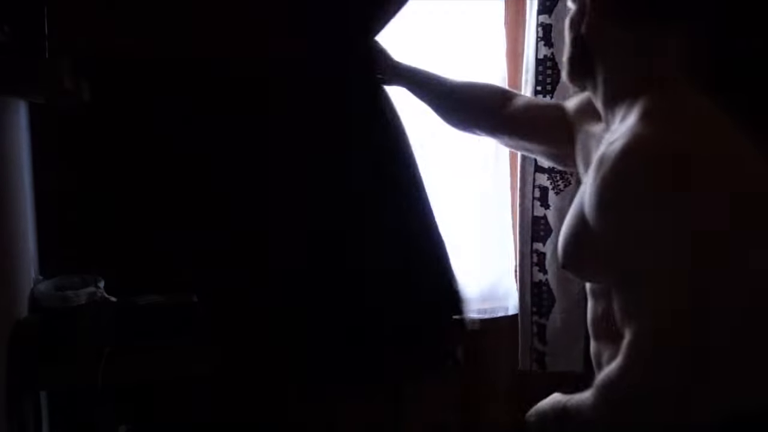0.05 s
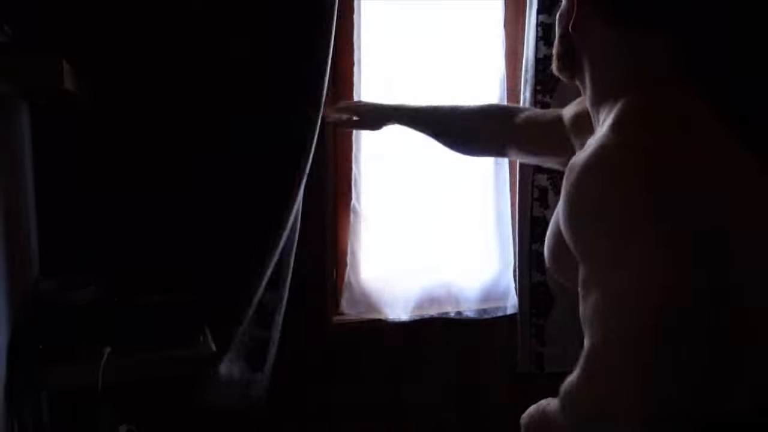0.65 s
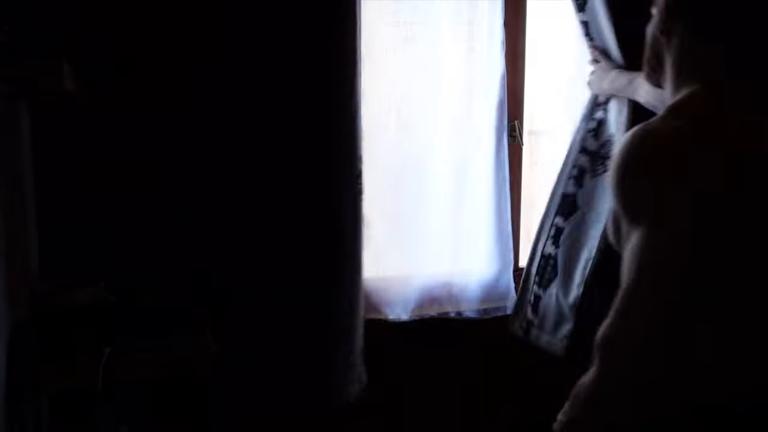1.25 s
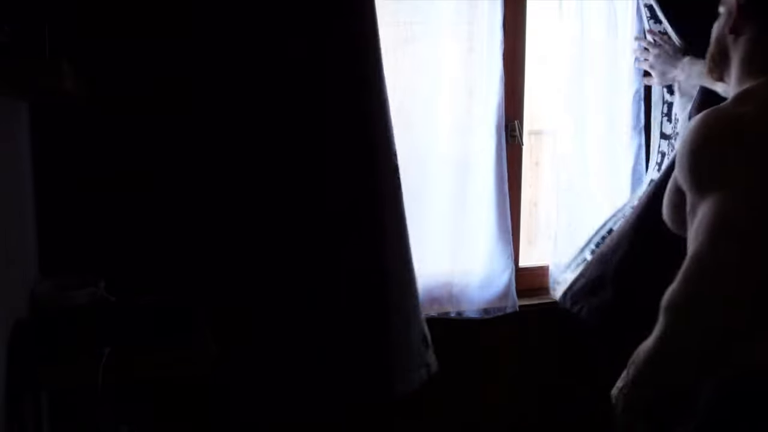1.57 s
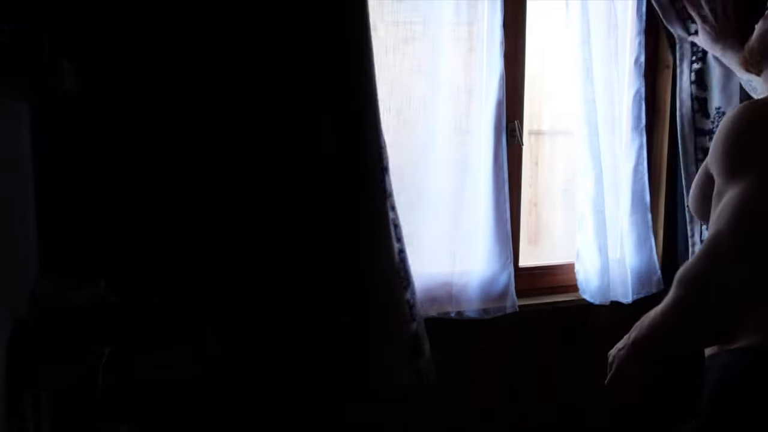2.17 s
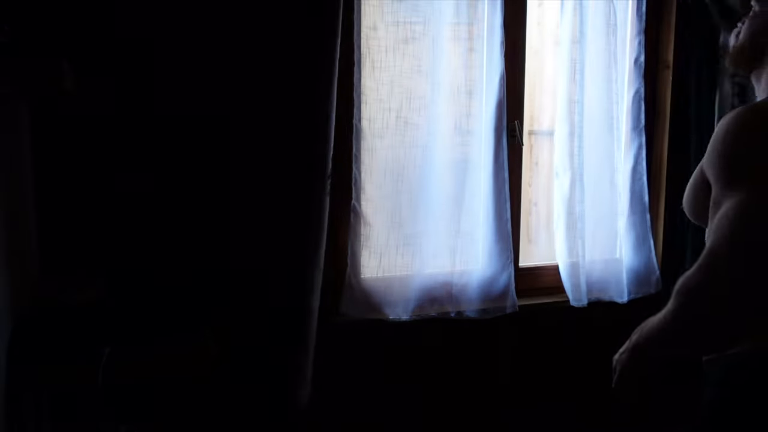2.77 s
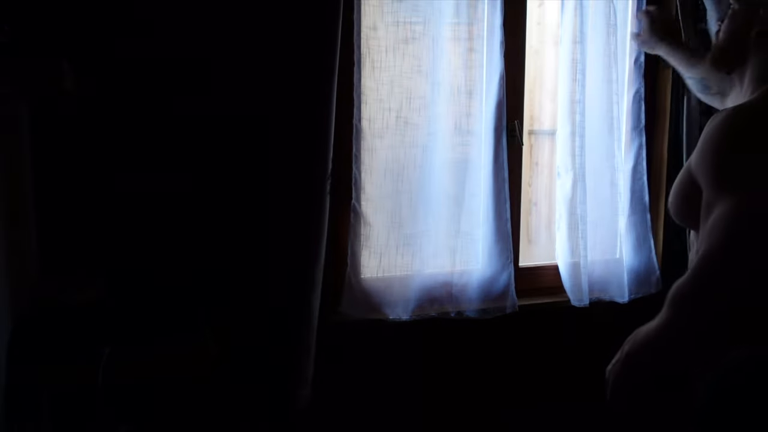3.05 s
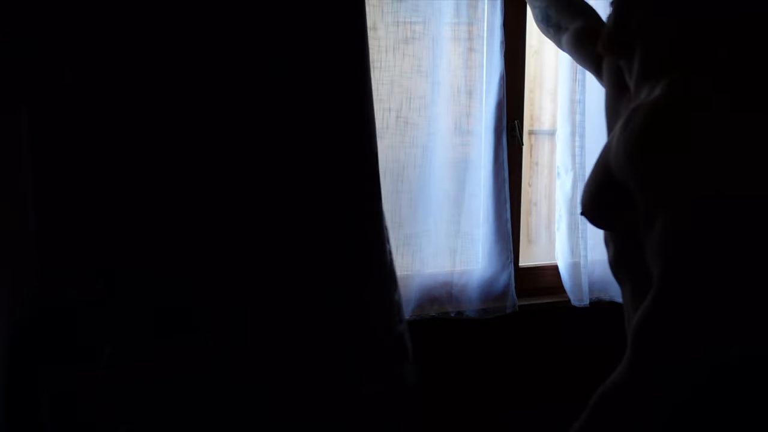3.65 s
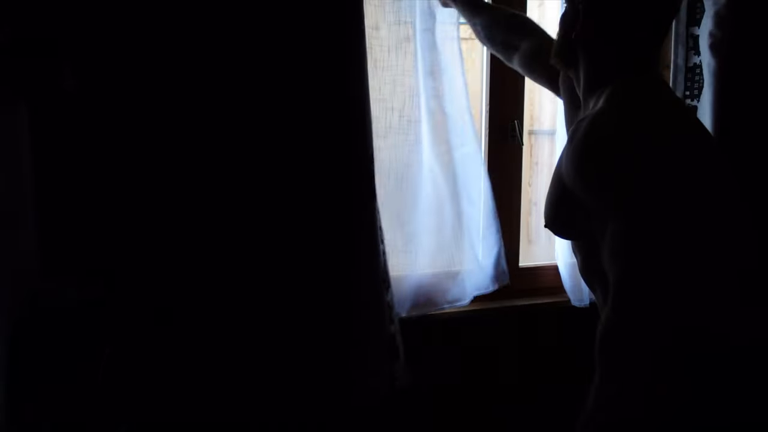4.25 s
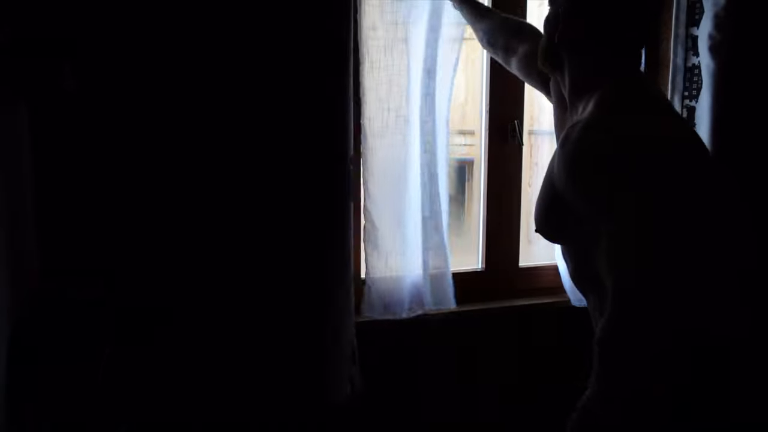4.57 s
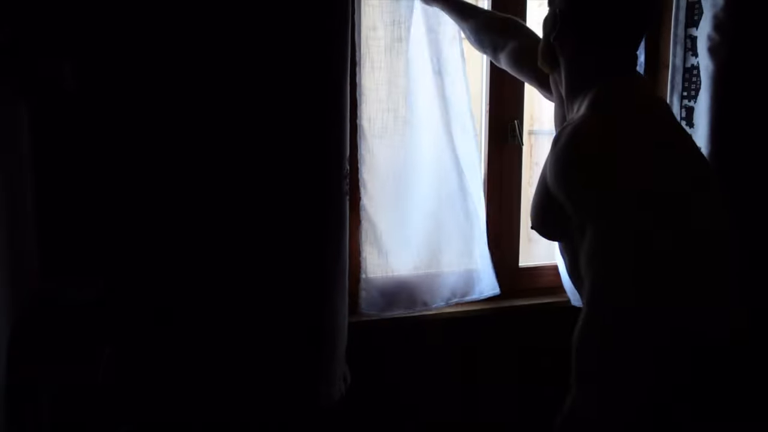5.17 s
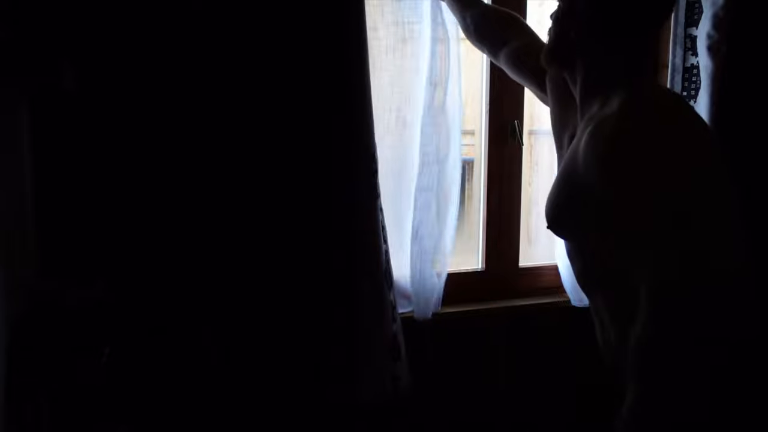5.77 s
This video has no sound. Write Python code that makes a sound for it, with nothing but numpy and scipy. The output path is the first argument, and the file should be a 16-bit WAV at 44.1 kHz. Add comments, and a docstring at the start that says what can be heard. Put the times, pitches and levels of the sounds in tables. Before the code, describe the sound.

Rings scrape quickly along a pole and clack together as a hand pulls a heavy curtain aside. After a short lull, another curtain slides in several quieter tugs, its folds swishing until the rings bunch up. Last come very soft brushes of a net curtain, with a small click and slight groans from its rod. Everything is heard from almost straight ahead in a small, quiet room with brief echoes.

```python
"""A bright scrape and a clatter of rings: a heavy curtain is pulled open by hand in a small bedroom.
The left one goes first, then the right, then the light net curtain behind them.
Rings stick and slip along the pole and clack together as the cloth bunches; the folds swish and flap.
The net hisses along its thin rod, which knocks and groans softly under the hem.
Short wall echoes and a faint room tone sit behind it all."""
import sys
import numpy as np
from scipy import signal
from scipy.io import wavfile

SR = 44100
rng = np.random.default_rng(int(sys.argv[2]) if len(sys.argv) > 2 else 0)


def unload_audio(sound):
    """Save the sound as a 16-bit wav file, at the path given as the first command line argument."""
    columns = np.transpose(np.atleast_2d(sound))
    # keep every value between -1 and 1, then stretch to whole-number steps
    steps = np.round(np.clip(columns, -1, 1) * 32767)
    wavfile.write(sys.argv[1], SR, steps.astype(np.int16))


N = 260184
TIME = np.arange(N) / SR
EDGES = np.geomspace(35, 17000, 23)   # filter bank, Hz
CENTRES = np.sqrt(EDGES[1:] * EDGES[:-1])
BANK = [signal.butter(2, pair, "band", fs=SR, output="sos") for pair in zip(EDGES, EDGES[1:])]

# Tone colours. Each row: frequency in Hz, relative level in dB.
AIR_MID_EQ = [(18, -67), (30, -36.5), (149, 2), (394, -1), (649, -6), (702, -1), (937, -5.5), (1040, -3.5),
              (1720, -7.5), (1860, -9), (2230, -5.5), (2750, -10.5), (3980, -13), (4910, -14), (16000, -22)]
AIR_SIDE_EQ = [(18, -65), (30, -35), (197, 2.5), (241, 1.5), (665, -8), (1050, 0), (5910, -21),
               (10600, -37), (13000, -43.5)]
NET_HISS_EQ = [(1300, 5.5), (2000, 4), (3200, 2), (5000, -1), (7500, -1), (10000, -4), (15500, -11)]
NET_FOLDS_EQ = [(30, -18), (60, -16), (110, 0.5), (180, 2), (400, -5)]
HEM_EQ = [(250, 11), (450, 12), (900, 9), (1500, -20), (2500, -18)]
CLOTH_HISS_EQ = [(2500, -12.5), (5000, 4), (7000, 2), (10000, -4.5), (13000, -10.5), (15500, -17)]
LEFT_FOLDS_EQ = [(50, -31), (80, -14), (125, -5), (200, -4.5), (260, -3), (360, -3), (470, -5.5), (620, -7)]
RIGHT_FOLDS_EQ = [(50, -22), (75, -20), (115, -0.5), (180, -2.5), (260, -1), (360, -1.5), (470, -5),
                  (620, -15)]
LEFT_SCRAPE_EQ = [(700, -14.5), (900, -7), (1100, 0), (1600, 1), (2200, -8), (2800, -2), (3600, -9.5),
                  (4700, -11.5), (6000, -31.5), (11000, -33)]
RIGHT_SCRAPE_EQ = [(800, -13), (1100, -0.5), (1500, -1), (2200, -0.5), (3400, 3), (4700, -5.5),
                   (5800, -7.5), (11000, -35)]
HOLLOW_POLE_EQ = [(400, -11.5), (520, -2.5), (640, 2), (800, 4), (1000, -9.5)]
JOSTLE_EQ = [(210, -37.5), (350, -4.5), (1430, -3.5), (2000, 0), (2130, 0.5), (2980, -2.5), (3920, 0),
             (5060, -10), (10600, -21.5), (16000, -33.5)]
CLACK_EQ = [(40, -25), (110, -14), (250, 7.5), (400, -8.5), (750, 0), (4500, 1.5), (6500, 2), (10000, -1.5),
            (15500, -8)]

# Resonances. Each row: frequency in Hz, width in Hz, relative gain in dB.
AIR_MODES = [(1120, 250, -7.5), (1690, 130, 9)]   # faint colour of the room tone
WEAVE_MODES = [(3230, 1400, -8), (5070, 860, 1), (7700, 320, 3)]   # threads zipping over the rod
ROD_MODES = [(840, 47, 2), (1385, 180, 7.5), (1596, 50, 11.5), (2780, 150, -1.5), (3210, 74, 4),
             (4110, 81, 2.5), (5720, 110, 5)]
FREE_RING_MODES = [(1250, 63, 2.5), (1700, 220, -1.5), (3250, 90, -5.5), (3730, 100, -2.5),
                   (4390, 130, -0.5), (4800, 120, -3)]
LEFT_POLE_MODES = [(350, 67, 3), (1076, 100, -1.5), (1163, 35, -0.5), (1526, 290, 1), (2044, 290, -0.5),
                   (2700, 230, -2), (4000, 220, 0.5), (5480, 140, -4)]   # each half of the pole with its rings
RIGHT_POLE_MODES = [(605, 87, -0.5), (741, 330, 1.5), (1183, 47, 1), (1566, 120, 1.5), (1840, 87, -6.5),
                    (2380, 170, -16), (3200, 340, -10), (3910, 79, -8), (4380, 46, -2), (4780, 370, -3.5)]

# The bedroom's decay. Each row: frequency in Hz, seconds to fade by 60 dB.
ROOM_T60 = [(100, 0.66), (300, .32), (1200, 0.27), (4000, 0.24), (14000, 0.2)]

# The cues below give relative levels. A swell's rise and fall are the times it takes over its top 10 dB.
# The thin rod groaning. Each row: start in seconds, length in seconds, pitch in Hz, level in dB.
GROANS = [(4.598, .035, 271.6, -59), (4.692, 0.07, 281.5, -64.5), (5.03, .145, 290.6, -57),
          (5.265, 0.019, 272.3, -57.5), (5.364, .12, 281, -66.5), (5.513, .035, 281, -52.5),
          (5.587, 0.038, 277, -51)]
# Strokes of the net. Each row: peak time, rise and fall in seconds, then hiss, folds and sheen in dB.
NET_STROKES = [(4.04, 0.12, 0.22, -56.5, -66.5, -67), (4.205, 0.052, 0.075, -62.5, -77, -59),
               (4.52, .17, 0.21, -72.5, -68.5, -74.5), (4.745, 0.059, 0.088, -57, -62, -65),
               (4.99, 0.049, 0.16, -47.5, -68.5, -57.5), (5.1, 0.033, 0.11, -52.5, -69, -53),
               (5.36, 0.3, .25, -68, -67, -69), (5.535, 0.034, 0.048, -59, -67, -63.5),
               (5.885, 0.027, 0.024, -66, -74.5, -61)]
# Its hem catching on the rod. Each row: peak time, rise and fall in seconds, level in dB.
HEM_RUBS = [(5.075, 0.048, 0.093, -51.5), (5.535, 0.025, 0.059, -56)]
# Single rings pinging and soft bumps on the window frame.
# Each row: start in seconds, pitch in Hz, level in dB, seconds to fade by 60 dB.
PINGS_AND_BUMPS = [(0.1522, 5090, -15.5, 0.0098), (0.233, 7470, -10, 0.013), (0.241, 6000, -14, 0.017),
                   (3.0215, 3423, -54, 0.051), (4.718, 120.4, -49, 0.29), (5.191, 103.6, -56.5, 0.24)]
# Clacks of rings, pole and rod; harder contacts centre higher.
# Each row: start in seconds, level in dB, centre in Hz, roll-off to either side in dB per octave.
CLACKS = [(0.151, -15.5, 1700, 3.5), (0.234, -7, 5600, 1.5), (0.238, -3.5, 3500, 8.5),
          (0.263, -8.5, 2900, 6.5), (0.286, -8, 3820, 4), (0.292, -7.5, 4000, 2), (0.3, -3, 3880, 8),
          (0.309, -4.5, 4300, 3), (0.317, -17, 2100, 8), (0.342, -1.5, 1680, 8.5), (0.346, -2, 1600, 6.5),
          (0.355, -9.5, 1396, 5), (0.366, -3, 1550, 10), (0.372, -23, 1391, 6.5), (0.381, -16.5, 1208, 2.5),
          (0.698, -41, 2988, 26), (2.137, -41.5, 3890, 5.5), (2.385, -33, 770, 16), (2.469, -33, 850, 16),
          (2.491, -34, 1400, 9), (2.676, -11, 1280, 7), (2.68, -11, 725, 7.5), (2.698, -22.5, 900, 4),
          (2.744, -19.5, 1500, 7), (2.749, -15.5, 3000, 10), (2.802, -23, 840, 7.5), (2.81, -25.5, 597, 8),
          (3.021, -37.5, 3212, 5), (4.746, -25.5, 4100, 11), (4.754, -23.5, 2400, 7)]
# Heavy cloth gathered in the hand or swinging back.
# Each row: peak time, rise and fall in seconds, then hiss and folds in dB.
SWISHES = [(0.135, 0.085, .08, -44.5, -61), (0.55, 0.11, .23, -58.5, -62.5), (1.36, 0.26, 0.5, -58, -59.5),
           (2.22, 0.1, 0.07, -61, -59), (2.46, 0.2, 0.056, -56, -56.5), (2.94, 0.12, 0.22, -60, -60.5),
           (3.06, 0.028, 0.062, -75, -57)]
# Rings and cloth piling up at the end of a pull.
# Each row: peak time, rise and fall in seconds, then jostling rings and folds in dB.
PILE_UPS = [(0.24, .005, 0.088, -21, -44), (0.305, .03, 0.022, -11.5, -36.5),
            (0.349, 0.0095, 0.021, -14, -26), (0.385, .03, .04, -35.5, -31),
            (2.68, 0.0086, 0.0513, -29, -49.5), (2.715, 0.027, 0.072, -33.5, -29.5)]
# Tugs that slide a heavy curtain along its pole.
# Each row: time of top speed, rise and fall in seconds, then scrape and weight on the rings in dB.
TUGS = [(0.003, 0.027, 0.013, -30, -5), (0.18, 0.18, 0.14, -27.5, -3.5), (1.461, 0.07, 0.075, -42, -12.5),
        (1.915, 0.08, 0.13, -45.5, -2.5), (2.235, 0.027, 0.018, -60.5, -2), (2.494, 0.041, 0.031, -49.5, 4),
        (2.666, 0.14, 0.022, -36, -7)]

TUG_CURVE, CLOTH_CURVE, PILE_CURVE = 1.7, 1.3, 1.05   # swell shape: 1 is pointed, 2 is round


def from_db(db):
    """Decibels to gain."""
    return 10 ** (np.asarray(db) / 20)


def rms_one(x):
    """Scale to unit power."""
    return x / np.sqrt(np.mean(x ** 2) + 1e-20)


def at_hz(points, hz):
    """Read a table on a log-frequency axis."""
    f, value = np.transpose(points)
    return np.interp(np.log(hz), np.log(f), value)


def drift(per_s):
    """A random wander of unit power, with per_s turning points a second."""
    knots = np.arange(0, 7, 1 / per_s)
    return rms_one(np.interp(TIME, knots, rng.standard_normal(len(knots))))


def colour(sources, eq, flicker_db=0):
    """Shape noise to an EQ: bands take the two sources in turn, each with a flicker of its own."""
    out = np.zeros(N)
    for k, (sos, hz) in enumerate(zip(BANK, CENTRES)):
        if eq[0][0] / 1.2 < hz < eq[-1][0] * 1.2:
            gain = from_db(at_hz(eq, hz) + flicker_db * drift(25))
            out += gain * signal.sosfilt(sos, sources[k % 2])
    return rms_one(out)


def slips(per_s, spread_db):
    """Two trains of tiny stick-slip releases, sharing their moments but not their strengths."""
    sizes = from_db(spread_db * np.minimum(rng.exponential(1, N), 4))
    released = rng.random(N) < per_s / SR
    return released * sizes * rng.standard_normal((2, N)) / np.sqrt(per_s) + 1e-18


def ringing(x, modes):
    """The modes that x excites, each a two-pole band-pass."""
    out = np.zeros(N)
    for hz, width, db in modes:
        r = np.exp(-np.pi * width / SR)
        feedback = [1, -2 * r * np.cos(2 * np.pi * hz / SR), r * r]
        out += from_db(db) * signal.lfilter(np.array([1, 0, -1]) * (1 - r * r) / 2, feedback, x)
    return out


def body(x, modes, ring_db):
    """A sound plus the modes it sets ringing, at unchanged power."""
    return rms_one(x + from_db(ring_db) * ringing(x, modes)) * np.sqrt(np.mean(x ** 2))


def swells(rows, span, curve, column=0, steepness=1):
    """Envelope of the moves within the span: each swells to the level in one dB column; powers add."""
    power = np.zeros(N)
    for s, rise_s, fall_s, *db in rows:
        if span[0] <= s < span[1]:
            away = np.maximum((s - TIME) / rise_s, (TIME - s) / fall_s)
            swell_db = -10 * np.minimum(away, 20) ** curve
            power += from_db(db[column] + steepness * swell_db) ** 2
    return np.sqrt(power + 1e-30)


def room_tone(level_db, side_db):
    """A faint, wide bed of steady room noise and hiss."""
    mid = body(colour(rng.standard_normal((2, N)), AIR_MID_EQ, flicker_db=0.1), AIR_MODES, ring_db=-8.5)
    side = from_db(side_db) * colour(rng.standard_normal((2, N)), AIR_SIDE_EQ)
    return from_db(level_db) * np.array([mid + side, mid - side])


def echoes(build_s, early_db=0):
    """Strong reflections from the window recess, then wall echoes that die band by band."""
    t = TIME[:SR // 2]
    early_lift = 1 + from_db(early_db) * np.exp(-t / 0.0034)
    noise = rng.standard_normal((2, len(t))) * (1 - np.exp(-t / build_s)) * early_lift
    tail = np.zeros(len(t))
    for k, (sos, hz) in enumerate(zip(BANK, CENTRES)):
        decay = from_db(-60 * t / at_hz(ROOM_T60, hz))
        tail += rms_one(signal.sosfilt(sos, noise[k % 2]) * decay) * np.sqrt(hz)
    return rms_one(tail) / np.sqrt(len(t))


def bedroom(x, wet_db, side_db, left_db):
    """The sounding spot wanders along the curtain, so its echoes keep shifting."""
    turns = TIME * 9 - np.arange(4)[:, None] / 4   # circle through four echo patterns at 9 Hz
    fades = np.maximum(0, np.cos(2 * np.pi * turns))
    room = sum(signal.oaconvolve(x * fade, echoes(build_s=0.0024, early_db=3.5))[:N] for fade in fades)
    wet = from_db(wet_db)
    mid = (x + wet * room) / np.hypot(1, wet)
    # the stereo spread is in the lows and mids; the treble stays centred
    spread_band = signal.sosfilt(signal.butter(2, [150, 3500], "band", fs=SR, output="sos"), x)
    side = from_db(side_db) * signal.oaconvolve(spread_band, echoes(build_s=0.001))[:N]
    return np.array([mid + side, mid - side]) * from_db([[left_db / 2], [-left_db / 2]])


def rod_groan(waver, flutter_db, attack_s, release_db_per_s):
    """The hem draws a nearly pure, unsteady friction tone from the rod: it builds, holds and rings out."""
    wobble = 1 + waver * drift(42)
    out = np.zeros(N)
    for s, length_s, hz, db in GROANS:
        attack = np.clip((TIME - s) / attack_s, 0, 1)
        release_db = release_db_per_s * np.clip(TIME - s - length_s, 0, 1)
        out += attack * from_db(db - release_db) * np.sin(2 * np.pi * np.cumsum(hz * wobble) / SR)
    return np.sqrt(2) * out * from_db(flutter_db * drift(26.9))


def net_curtain(span):
    """Light cloth zips over the rod and brushes itself with a sheen; its hem rubs, its folds stir air."""
    hiss, flap, sheen = (swells(NET_STROKES, span, CLOTH_CURVE, column=k) for k in range(3))
    hem = swells(HEM_RUBS, span, CLOTH_CURVE)
    threads = colour(slips(9000, spread_db=2.5), NET_HISS_EQ, flicker_db=4)
    cloth = hiss * body(threads, WEAVE_MODES, ring_db=4)
    cloth += sheen * colour(slips(9000, spread_db=4), CLOTH_HISS_EQ, flicker_db=2)
    cloth += hem * colour(slips(4000, spread_db=3.5), HEM_EQ, flicker_db=2.5) * from_db(-2)
    cloth += flap * colour(rng.standard_normal((2, N)), NET_FOLDS_EQ, flicker_db=5) * from_db(5)
    return cloth


def pings_and_bumps():
    """A ring pings or the window frame is bumped: one damped mode each."""
    out = np.zeros(N)
    for s, hz, db, t60 in PINGS_AND_BUMPS:
        start = int(s * SR)
        t = TIME[:min(SR // 3, N - start)]
        out[start:start + len(t)] += from_db(db - 60 * t / t60) * np.sin(2 * np.pi * hz * t)
    return out


def free_rings(span, gain_db):
    """Sliding rings sing in their own modes; weight damps them, so light tugs ring most freely."""
    damping = 0.69   # dB of ringing lost per dB of weight
    damped_tugs = [(s, rise, fall, db - damping * weight_db) for s, rise, fall, db, weight_db in TUGS]
    singing = rms_one(ringing(slips(3000, spread_db=2)[0], FREE_RING_MODES))
    return from_db(gain_db) * swells(damped_tugs, span, TUG_CURVE) * singing


def clacks(span, modes, snap_db, crack_s, rattle_s, rattle_db, gain_db, ring_db):
    """Each clack is a snap, a short crack and a buzz of rebounds, coloured by what it strikes."""
    t = TIME[:SR // 10]
    out = np.zeros(N + len(t))
    envelope = rms_one(np.exp(-t / crack_s) + from_db(rattle_db) * np.exp(-t / rattle_s))
    for s, db, centre_hz, db_per_octave in CLACKS:
        if span[0] <= s < span[1]:
            bursts = rng.standard_normal((2, len(t))) * envelope
            bursts[:, 0] = from_db(snap_db) * np.sqrt(len(t)) * np.array([1, -1])
            rolloff_db = np.minimum(db_per_octave * np.abs(np.log2(CENTRES / centre_hz)), 36.5)
            gains = from_db(at_hz(CLACK_EQ, CENTRES) - rolloff_db)
            bands = [rms_one(signal.sosfilt(sos, bursts[k % 2])) for k, sos in enumerate(BANK)]
            start = int(s * SR)
            out[start:start + len(t)] += from_db(db + gain_db) * rms_one(gains @ bands)
    return body(out[:N], modes, ring_db)


def heavy_curtain(span, scrape_eq, folds_eq, pole_modes,
                  scrape_db, hollow_db, flap_db, hiss_db, drag_db, jostle_db, heap_db):
    """Rings scrape with denser slips as they speed up, then jostle in a bunch; cloth flaps and hisses."""
    swish, sway = (swells(SWISHES, span, CLOTH_CURVE, column=k) for k in range(2))
    jostle, heap = (swells(PILE_UPS, span, PILE_CURVE, column=k) for k in range(2))
    loaded_tugs = [(s, rise, fall, db + weight_db) for s, rise, fall, db, weight_db in TUGS]
    drag = swish * from_db(drag_db)   # moving cloth drags the rings a little
    scrape = np.hypot(swells(TUGS, span, TUG_CURVE), drag)
    hollow = swells(loaded_tugs, span, TUG_CURVE, steepness=1.7)   # weight on the rings bends the pole
    flap = np.hypot(swells(loaded_tugs, span, TUG_CURVE) * from_db(flap_db), sway)
    hiss = np.hypot(swells(loaded_tugs, span, TUG_CURVE, steepness=0.75) * from_db(hiss_db), swish)

    speed = np.sqrt(scrape / scrape.max())
    friction = slips(2500 + 6000 * speed, spread_db=0.5)
    rings = scrape * colour(friction, scrape_eq, flicker_db=3) * from_db(scrape_db)
    rings += hollow * colour(friction, HOLLOW_POLE_EQ, flicker_db=2.5) * from_db(hollow_db)
    rings += jostle * colour(slips(2500, spread_db=3), JOSTLE_EQ) * from_db(jostle_db)
    stirred_air = colour(rng.standard_normal((2, N)), folds_eq, flicker_db=3.5)
    folds = (flap + heap * from_db(heap_db)) * stirred_air
    weave = hiss * colour(slips(9200, spread_db=0.5), CLOTH_HISS_EQ, flicker_db=2.4) * from_db(-1.5)
    return body(rings, pole_modes, ring_db=0) + folds + weave


def scene():
    """Three curtains in turn, all at the window, a touch left of centre."""
    left_span, right_span, net_span = (0, 1), (1, 4), (4, 6)   # seconds
    left = heavy_curtain(left_span, LEFT_SCRAPE_EQ, LEFT_FOLDS_EQ, LEFT_POLE_MODES, scrape_db=-1.8,
                         hollow_db=-2, flap_db=-10.5, hiss_db=-22, drag_db=2.5,
                         jostle_db=-5.5, heap_db=-3.5)
    left += clacks(left_span, LEFT_POLE_MODES, snap_db=-5, crack_s=0.0013,
                   rattle_s=0.009, rattle_db=-6, gain_db=-23, ring_db=-4)
    right = heavy_curtain(right_span, RIGHT_SCRAPE_EQ, RIGHT_FOLDS_EQ, RIGHT_POLE_MODES, scrape_db=-1,
                          hollow_db=-5, flap_db=-3, hiss_db=-9.5, drag_db=5.5,
                          jostle_db=-2, heap_db=-4.5)
    right += clacks(right_span, RIGHT_POLE_MODES, snap_db=-8.5, crack_s=0.001,
                    rattle_s=0.0087, rattle_db=-0.5, gain_db=-20, ring_db=4.5)
    left += free_rings(left_span, gain_db=-13.5)
    right += free_rings(right_span, gain_db=-13)
    net = net_curtain(net_span)
    net += clacks(net_span, ROD_MODES, snap_db=-5, crack_s=0.0014,
                  rattle_s=0.011, rattle_db=-10.5, gain_db=-23, ring_db=6.5)
    curtains = bedroom(left + right + net + pings_and_bumps(), wet_db=-4.5, side_db=-18, left_db=0.6)
    groan = rod_groan(waver=0.0093, flutter_db=0.8, attack_s=0.015, release_db_per_s=328.5)
    return curtains + groan + room_tone(level_db=-63, side_db=-3)


def record(dry):
    """Trim the deep bass and the very top."""
    low_cut = signal.sosfilt(signal.butter(2, 55, "high", fs=SR, output="sos"), dry)
    return signal.sosfilt(signal.ellip(10, 0.1, 90, 15900, fs=SR, output="sos"), low_cut)


dry = scene()
out = record(dry)
unload_audio(out)
```